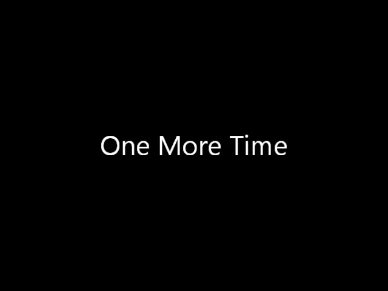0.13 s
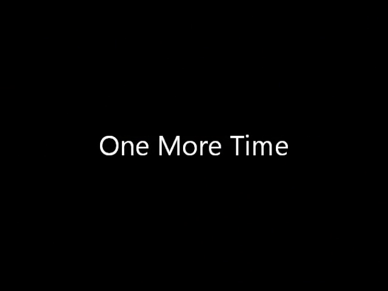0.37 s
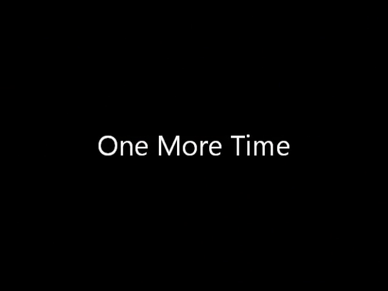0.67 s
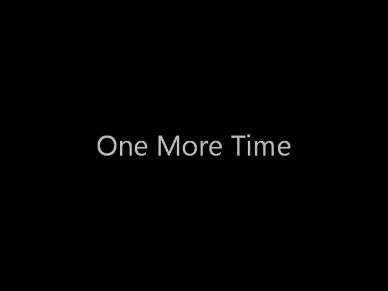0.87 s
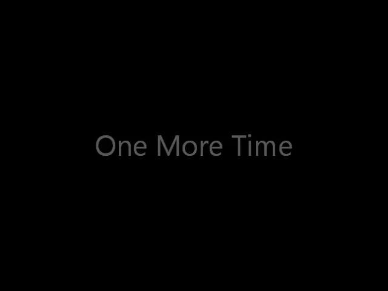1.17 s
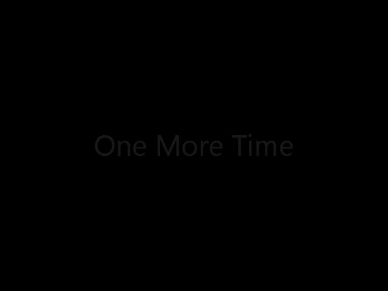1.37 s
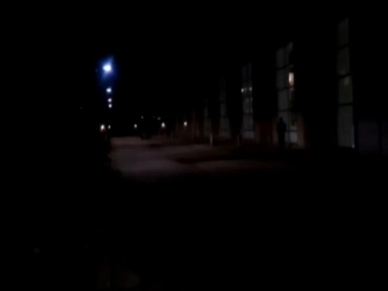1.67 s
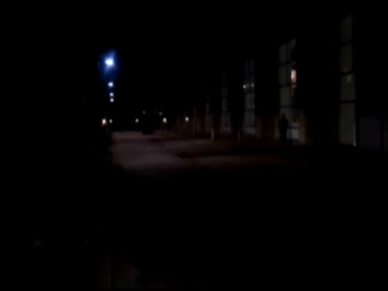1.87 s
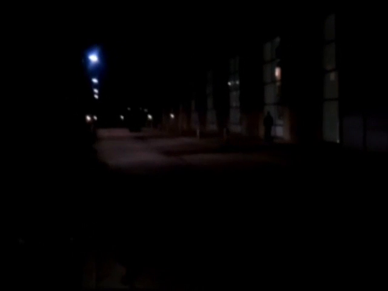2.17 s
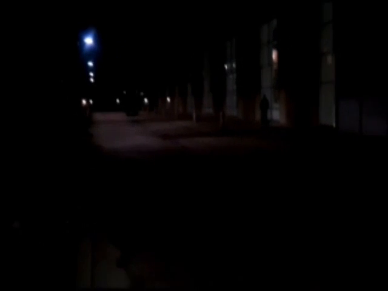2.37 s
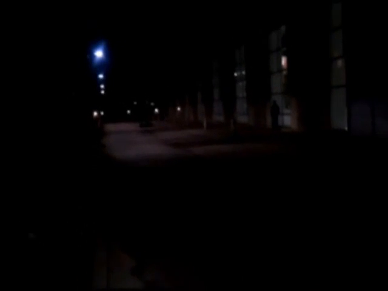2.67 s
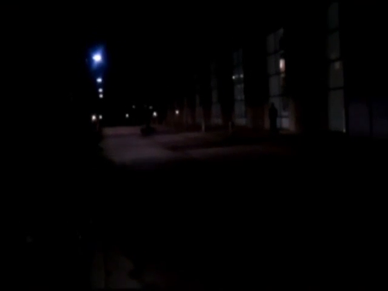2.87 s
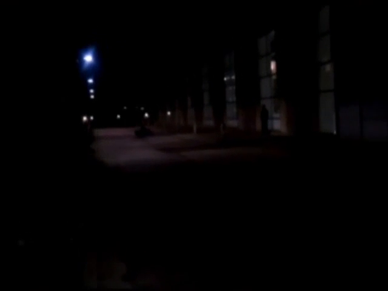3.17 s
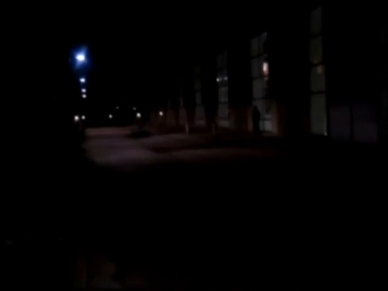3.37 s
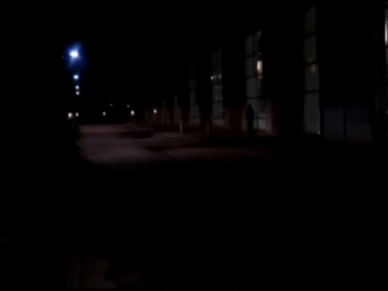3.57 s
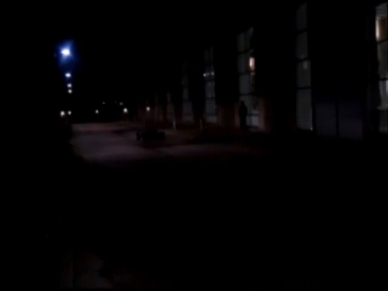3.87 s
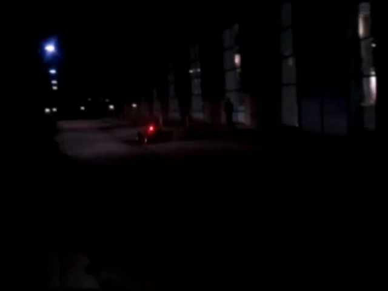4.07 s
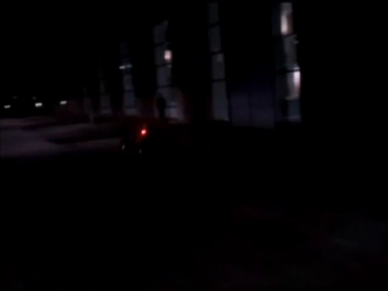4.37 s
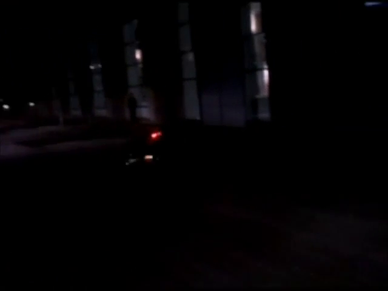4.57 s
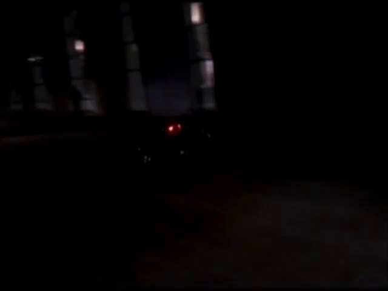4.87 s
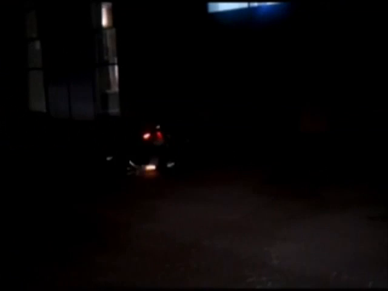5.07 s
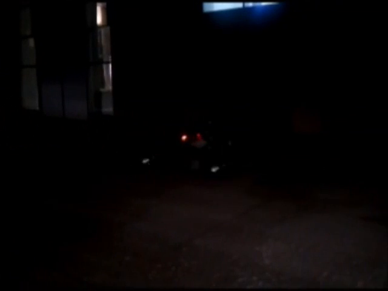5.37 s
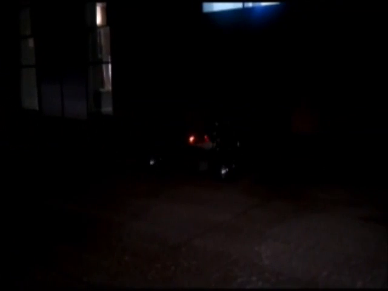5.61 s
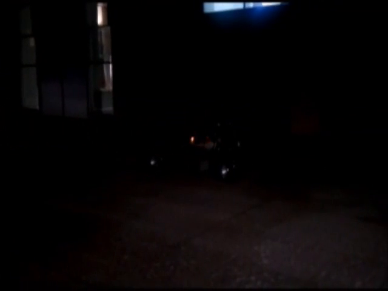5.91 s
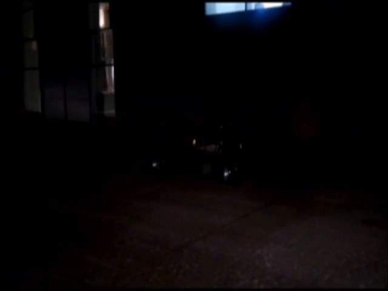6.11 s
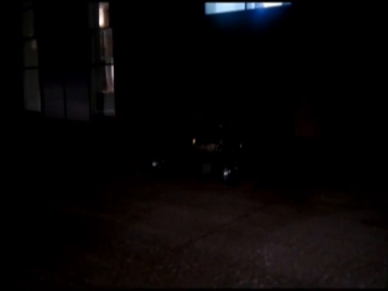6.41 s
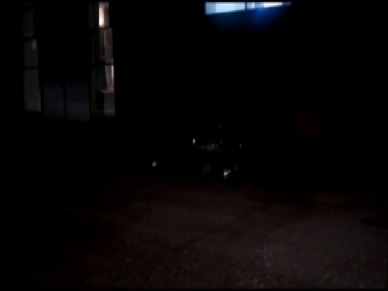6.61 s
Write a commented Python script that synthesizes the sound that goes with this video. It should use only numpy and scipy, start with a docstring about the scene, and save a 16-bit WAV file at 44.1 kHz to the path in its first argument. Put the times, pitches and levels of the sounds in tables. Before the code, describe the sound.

A raspy race car accelerates hard between buildings, booming off the walls, then slows with short throttle blips and faint metal chinks.

```python
"""A race car with an open eight-cylinder exhaust revs up in an alley while loose metal chinks faintly.
Each firing rings the pipe and drives out turbulent gas; brick walls throw the sound back as a boom.
After two seconds it roars at full throttle and overloads the microphone of a small camera.
From three seconds the driver lifts off and the revs sink, with a few short stabs at the throttle.
The metal chinks once more, and the treble dies away as the engine settles towards idle."""
import sys
import numpy as np
from scipy import signal
from scipy.fft import rfft, irfft, next_fast_len
from scipy.io import wavfile
from scipy.ndimage import uniform_filter1d, map_coordinates

SR = 44100
rng = np.random.default_rng(int(sys.argv[2]) if len(sys.argv) > 2 else 0)


def store_wav(level_fs):
    """Save 16-bit WAV to argv[1]."""
    pcm = np.round(np.clip(np.atleast_2d(level_fs), -1, 1) * 32767)
    wavfile.write(sys.argv[1], SR, pcm.T.astype(np.int16))


N = 297630

# engine speed in four-stroke cycles per second: time_s, cycle_hz
ENGINE_SPEED = [(0, 31.08), (.52, 33.1), (.85, 36.45), (1.24, 38.08), (1.45, 40.62), (1.64, 51.4),
                (1.84, 47), (2.1, 54.6), (2.27, 67.6), (2.45, 67.2), (2.56, 55.9), (2.73, 53.65),
                (3.05, 60.5), (3.25, 51.29), (3.42, 53.53), (3.97, 46.7), (4.19, 42.37), (4.56, 38.02),
                (4.76, 41.6), (4.96, 40.01), (5.81, 29.36), (6.04, 32.03), (6.2, 24.4), (6.45, 29.99),
                (6.67, 23.78)]


def exhaust(cycle, load):
    """Source and filter: one train of firings excites four bands, from growl up to clatter."""
    # stabs at the throttle: start_s, length_s, growl_lift_db, bark_lift_db
    throttle_stabs = [(0.245, .2, 0.5, -1), (1.282, .33, 2.5, 2), (2.86, .2, 1, 1.5), (4.68, .22, 1, 2.5),
                      (5.873, 0.26, 4.5, 1), (6.34, .45, 0.5, 3)]
    growl_db, bark_db = sum(np.outer(lifts_db, hump(start_s, length_s))
                            for start_s, length_s, *lifts_db in throttle_stabs)
    blows = firings(cycle, scatter_db=2.04, jitter_ms=0.18)
    pulses = steady(alley(blows, wet_db=1.0))
    gas = puffs(blows, life_ms=1.0, wet_db=8.0, t60_s=0.39)
    idle_start_s = 6.37
    idling_s = np.maximum(np.arange(N) / SR - idle_start_s, 0)
    return (amp(growl_db) * growl(pulses, gas, load)
            + amp(bark_db) * bark(pulses, gas, load)
            + rasp(blows, pulses, idling_s, fade_db_per_s=10)
            + clatter(blows, idling_s, fade_db_per_s=31))


def firings(cycle, scatter_db, jitter_ms):
    """Impulse excitation: one blow per cylinder, each a little off in size and time."""
    # blow of each cylinder in firing order, the two banks being uneven: level_db
    cylinders = [5.5, -9, 3, -4, -12.5, -1, -10, -5.5]
    onsets = np.flatnonzero(np.diff(np.floor(cycle * len(cylinders))) > 0)
    size_error, time_error = rng.standard_normal((4096, 2))[:len(onsets)].T
    strength = amp(np.resize(cylinders, len(onsets)) + scatter_db * size_error)
    onsets = np.clip(onsets + jitter_ms * time_error * SR / 1000, 0, N - 1)
    return np.bincount(onsets.astype(int), strength, N)


def puffs(blows, life_ms, wet_db, t60_s):
    """Turbulence: gas bursts out with each blow, and reverberation smears its energy into a hiss."""
    t = np.arange(SR // 2) / SR
    age = t * 1000 / life_ms
    burst = age * np.exp(-age)
    tail = amp(-60 * t / t60_s) ** 2
    energy_response = burst / burst.sum() + amp(wet_db) ** 2 * tail / tail.sum()
    energy = signal.fftconvolve(blows ** 2, energy_response)[:N]
    return steady(np.sqrt(np.abs(energy) + 1e-9) * rng.standard_normal(N))


def growl(pulses, gas, load):
    """Pipe resonance: the blows ring the pipe, and turbulence takes over from them under load."""
    # response of the pipe: freq_hz, gain_db
    pipe = [(120, -59), (200, -11.5), (265, -3), (335, 0), (420, -1.5), (480, -11), (580, -18),
            (900, -40.5), (2000, -80)]
    # level against effort: pull_db, pull_slope, coast_db, coast_slope
    law = (-19.5, 0.58, -24.5, 0.92)
    excitation = np.sqrt(1 - load) * pulses + np.sqrt(load) * gas
    return effort_gain(law) * steady(ring(excitation, pipe))


def bark(pulses, gas, load):
    """Radiation from the pipe mouth: a midrange blast that turns throatier under load."""
    # spectra at the mouth, pulling and coasting: freq_hz, gain_db
    mouth_pulling = [(300, -41), (480, -7.5), (590, -4.5), (690, -5), (770, -2), (890, -1.5), (1020, -6.5),
                     (1170, -14), (2200, -46)]
    mouth_coasting = [(300, -42.5), (500, -10.5), (630, 0.5), (780, -4.5), (950, -2.5), (1080, -2.5),
                      (1400, -8.5), (2300, -36.5)]
    # level against effort: pull_db, pull_slope, coast_db, coast_slope
    law = (-23.5, 1.23, -27.5, 1.13)
    blast = gas + amp(-4.5) * pulses
    throaty = steady(ring(blast, mouth_pulling))
    bright = steady(ring(blast, mouth_coasting))
    return effort_gain(law) * steady(load * throaty + (1 - load) * bright)


def rasp(blows, pulses, idling_s, fade_db_per_s):
    """Jet noise: the blows tear the air into a rasp that fades at idle."""
    # spectrum of the torn air: freq_hz, gain_db
    spectrum = [(800, -23.5), (1220, -4), (1550, 0), (1950, -3), (2400, -3), (2740, -8.5), (3030, -4.5),
                (3600, -13.5), (5000, -24), (8000, -57)]
    # level against effort: pull_db, pull_slope, coast_db, coast_slope
    law = (-32, 0.97, -31.5, 1.18)
    jet = puffs(blows, life_ms=0.98, wet_db=13.5, t60_s=0.27) + amp(-9.5) * pulses
    return effort_gain(law) * amp(-fade_db_per_s * idling_s) * steady(ring(jet, spectrum))


def clatter(blows, idling_s, fade_db_per_s):
    """Amplitude modulation: treble noise pulses with the firings and fades at idle."""
    # spectrum of the clatter: freq_hz, gain_db
    spectrum = [(2000, -27), (3300, -2), (3900, 1.5), (4300, -3), (4600, -0.5), (5300, -5), (6200, -9),
                (9500, -12), (16000, -20.5)]
    # level against effort: pull_db, pull_slope, coast_db, coast_slope
    law = (-44, 1.0, -39, 0.8)
    bursts = puffs(blows, life_ms=2.6, wet_db=14.0, t60_s=0.3)
    return effort_gain(law) * amp(-fade_db_per_s * idling_s) * steady(ring(bursts, spectrum))


def drone(cycle, flutter_db, sway_rad, fade_db):
    """Harmonic series: the low exhaust orders waver as combustion varies and fade among the echoes."""
    # exhaust orders 1 to 8: pull_db, coast_db
    orders = [(-3, -9.5), (0.5, -4.5), (-5.5, 0.5), (-4.5, 0.5), (-2.5, -6), (-5.5, -6), (-18.5, -6),
              (-20, -16)]
    # what the alley carries of a tone: freq_hz, gain_db
    transmission = [(25, -18), (36, -10), (47, -0.5), (66, 1), (85, -0.5), (120, 0), (190, 1), (280, -2),
                    (420, -4)]
    # level against effort: pull_db, pull_slope, coast_db, coast_slope
    law = (-19.5, 0.38, -19.5, 0.83)
    cycle_hz, coast, tones = curve(ENGINE_SPEED), coasting(), np.zeros(N)
    for order, (pull_db, coast_db) in enumerate(orders, 1):
        source_db = (1 - coast) * pull_db + coast * coast_db
        alley_db = along(transmission, order * cycle_hz) + standing_wave_db(order)
        phase = 2 * np.pi * (order * cycle + rng.random()) + sway_rad * wobble(27)
        waver_db = flutter_db * wobble(25) + fade_db * wobble(7)
        tones += amp(source_db + alley_db + waver_db) * np.sqrt(2) * np.sin(phase)
    return effort_gain(law) * tones


def effort_gain(law, cruise_db=-31):
    """Power law: a layer has a set level at cruise effort and a slope in dB per dB of effort."""
    # how hard the exhaust blows: time_s, effort_db
    effort = [(0.0, -46.5), (0.09, -45), (0.39, -36), (0.47, -40), (0.69, -33), (0.9, -36.5), (1.69, -28.5),
              (1.82, -31.5), (2.27, -21), (2.58, -25.5), (2.63, -20.5), (2.78, -25), (2.97, -21),
              (3.46, -28), (4.74, -32), (5.73, -38), (6.0, -37), (6.24, -42), (6.71, -41.5), (6.75, -45)]
    pull_db, pull_slope, coast_db, coast_slope = law
    push_db, coast = curve(effort) - cruise_db, coasting()
    pulling_db = pull_db + pull_slope * push_db
    coasting_db = coast_db + coast_slope * push_db
    return amp((1 - coast) * pulling_db + coast * coasting_db)


def coasting(lift_off_s=3, ease_s=0.63):
    """Linear crossfade: 0 while the engine pulls, 1 once the driver has lifted off."""
    return np.clip((np.arange(N) / SR - lift_off_s) / ease_s, 0, 1)


def alley(x, wet_db, positions=10):
    """Reverberation: the walls add echoes whose treble dies first and which shift as the car moves."""
    # reverberation time of the alley: freq_hz, t60_s
    decay_times = [(100, 0.65), (1000, 0.73), (7000, 0.46)]
    hz, t, spectra = signal.stft(rng.standard_normal((positions, SR * 3 // 4)), SR, nperseg=256)
    decay = amp(-60 * t / along(decay_times, hz)[:, None])
    tails = signal.istft(spectra * decay, SR, nperseg=256)[1]
    place = np.linspace(0, positions - 1, N)
    share = np.sqrt(np.clip(1 - np.abs(place - np.arange(positions)[:, None]), 0, 1))  # equal power
    echoes = signal.fftconvolve(x * share, tails / np.linalg.norm(tails[0]), axes=1)
    return x + amp(wet_db) * echoes.sum(0)[:N]


def standing_wave_db(order):
    """Interference: at set times an order booms on a resonance between the walls or drops in a null."""
    # resonances and nulls: start_s, length_s, exhaust_order, lift_db
    swells = [(.42, .38, 6, 6), (0.826, .36, 2, 6.5), (0.602, .7, 5, 2.5), (1.755, 0.2, 1, 9.5),
              (2.2, 0.15, 2, 3.5), (2.379, 0.21, 1, 6.5), (2.756, .18, 6, 14), (2.953, .14, 2, 6),
              (3.021, 0.16, 6, 11.5), (3.74, 0.35, 4, 1), (3.902, 0.41, 2, 6.5), (4.28, 0.25, 5, 10),
              (4.703, 0.544, 3, 6), (4.849, .25, 4, 5.5), (4.736, .26, 8, 14.5), (5.204, .35, 7, 7.5),
              (5.298, .55, 3, 7.5), (5.95, .2, 5, 8), (6.125, 0.24, 3, 6.5), (6.36, .2, 5, 7.5),
              (.58, 0.3, 2, -6), (5.4, .75, 2, -6), (5.87, 0.36, 3, -6)]
    return sum(lift_db * hump(start_s, length_s)
               for start_s, length_s, k, lift_db in swells if k == order)


def boom():
    """Reverberant build-up: uneven combustion piles up between the walls as a low rumble."""
    # bass spectrum between the walls: freq_hz, gain_db
    wall_bass = [(25, -29), (45, -8.5), (72, -2.5), (100, -1), (170, 0), (240, -4.5), (330, -11.5),
                 (600, -54.5)]
    # level against effort: pull_db, pull_slope, coast_db, coast_slope
    law = (-21, 0.37, -18.5, .95)
    return effort_gain(law) * steady(ring(rng.standard_normal(N), wall_bass))


def rattles(t60_s):
    """Exponential decay: each chink of loose metal on the car is a bright flick dying in the alley."""
    # chinks: start_s, level_db
    chinks = [(.16, -50.5), (.6, -46), (1.11, -46.5), (5.82, -42)]
    # spectrum of the metal: freq_hz, gain_db
    metal = [(2000, -32), (3000, -0.5), (4500, -4.5), (5700, 2), (16000, -17.5)]
    t = np.arange(N) / SR
    envelope = sum(amp(level_db - 60 * np.abs(t - start_s) / t60_s) * (t > start_s)
                   for start_s, level_db in chinks)
    return envelope * unit(ring(rng.standard_normal(N), metal))


def street(level_db):
    """Ambient noise: a faint, steady rumble in the night air."""
    # spectrum of the distant rumble: freq_hz, gain_db
    rumble = [(15, -7.5), (30, 0), (45, -0.5), (80, -16.5), (400, -40.5)]
    return amp(level_db) * unit(ring(rng.standard_normal(N), rumble))


def amp(db):
    """Decibels to amplitude gain."""
    return 10 ** (np.asarray(db) / 20)


def unit(x):
    """Normalisation to an overall rms of 1."""
    return x / np.sqrt(np.mean(x ** 2) + 1e-20)


def steady(x, size=6000):
    """Normalisation to a running rms of 1."""
    power = uniform_filter1d(uniform_filter1d(x ** 2, size), size // 2)
    return x / np.sqrt(np.abs(power) + 1e-12)


def along(points, hz):
    """Interpolation of (freq_hz, value) points on a log frequency axis."""
    freq_hz, values = np.transpose(points)
    return np.interp(np.log(hz + 1), np.log(freq_hz + 1), values)


def curve(points):
    """Interpolation of (time_s, value) points at every sample."""
    return np.interp(np.arange(N) / SR, *np.transpose(points))


def hump(start_s, length_s, edge_s=0.057):
    """Trapezoidal envelope: rise to 1, hold and fall."""
    t = np.arange(N) / SR
    return np.clip(np.minimum(t - start_s, start_s + length_s - t) / edge_s, 0, 1)


def wobble(rate_hz):
    """Random modulation: a smooth curve through rate_hz knots a second."""
    return map_coordinates(rng.standard_normal(2048), [np.arange(N) * rate_hz / SR], mode="wrap")


def ring(x, colour, size=8192):
    """Minimum-phase filtering by a (freq_hz, gain_db) colour."""
    gain_db = along(colour, np.fft.rfftfreq(size, 1 / SR))
    cepstrum = irfft(np.log(amp(gain_db) + 1e-6))
    cepstrum[1:size // 2] *= 2  # folding the cepstrum makes the filter causal
    cepstrum[size // 2 + 1:] = 0
    return signal.fftconvolve(x, irfft(np.exp(rfft(cepstrum))))[:N]


def filtered(x, response):
    """Zero-phase filtering by a gain that depends on frequency."""
    size = next_fast_len(N + SR // 2)
    return irfft(rfft(x, size) * response(np.fft.rfftfreq(size, 1 / SR)), size)[:N]


def scene():
    """Superposition: drone and exhaust, both timed by the crankshaft, over boom, chinks and street."""
    # a pulling engine fires raggedly, a coasting one evenly: time_s, load_fraction
    engine_load = [(0, 0.81), (1.5, 0.91), (2.9, .7), (3.4, 0.78), (3.8, 0.56), (5.5, 0.42), (6, 0.7),
                   (6.5, 0.3)]
    load = curve(engine_load)
    cycle_hz = curve(ENGINE_SPEED) * (1 + .002 * load * wobble(14))
    cycle = np.cumsum(cycle_hz) / SR
    tones = drone(cycle, flutter_db=2.37 * load, sway_rad=0.11 * load, fade_db=2.03)
    return (tones + exhaust(cycle, load) + boom() + rattles(t60_s=.45) + street(level_db=-41.5))[None]


def record(dry):
    """Saturation: a dull microphone feeds a band-limited input that flattens peaks and adds hiss."""
    # response of the microphone: freq_hz, gain_db
    microphone = [(6300, -0.5), (6900, -7), (7500, -24.5), (8300, -33.5), (9300, -15), (10200, -22.5),
                  (11500, -32), (15000, -38)]
    ceiling, hardness, hiss_db, top_hz = .48, 64, -89, 15750
    heard = filtered(dry[0], lambda hz: amp(along(microphone, hz)))
    clipped = heard / (1 + np.abs(heard / ceiling) ** hardness) ** (1 / hardness)
    hiss = amp(hiss_db) * rng.standard_normal(N)
    return filtered(clipped + hiss, lambda hz: hz < top_hz)[None]


dry = scene()
out = record(dry)
store_wav(out)
```